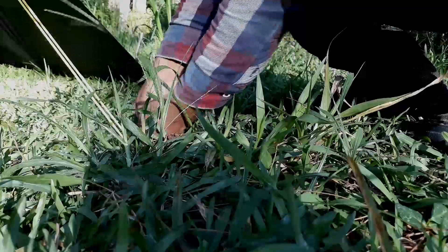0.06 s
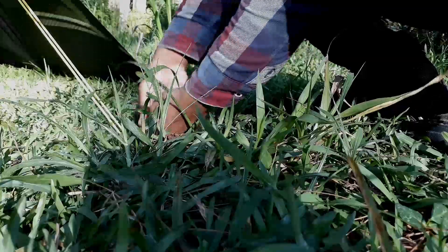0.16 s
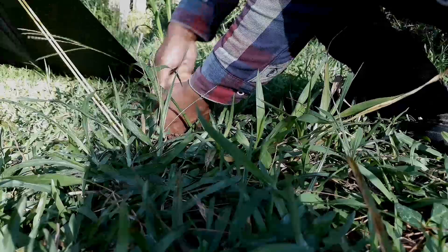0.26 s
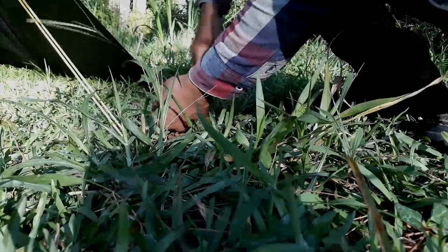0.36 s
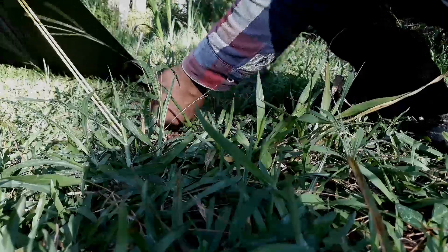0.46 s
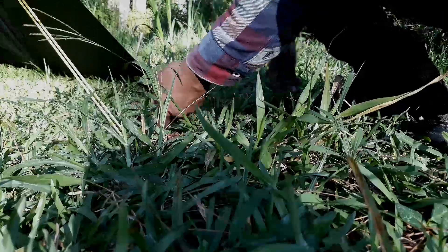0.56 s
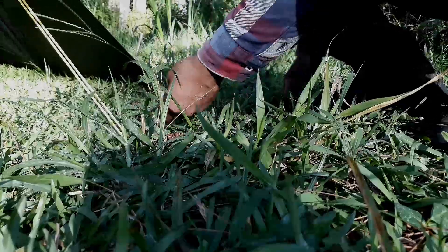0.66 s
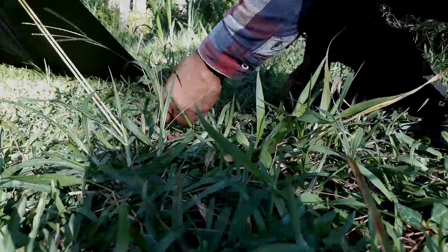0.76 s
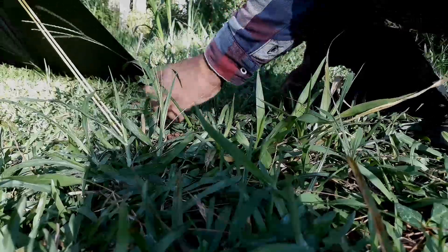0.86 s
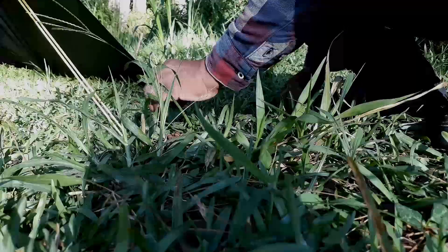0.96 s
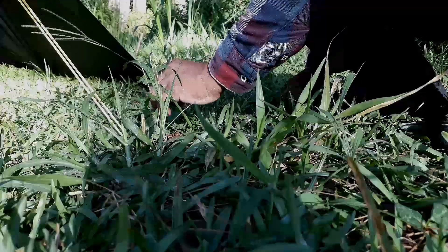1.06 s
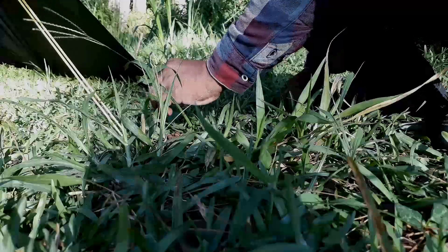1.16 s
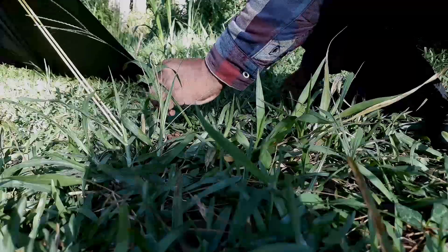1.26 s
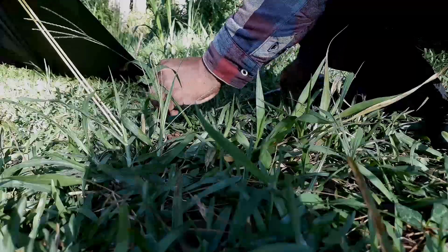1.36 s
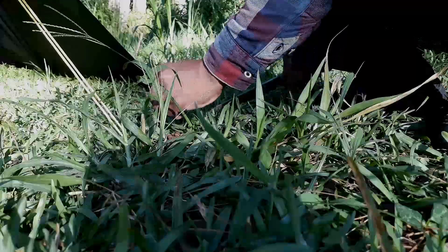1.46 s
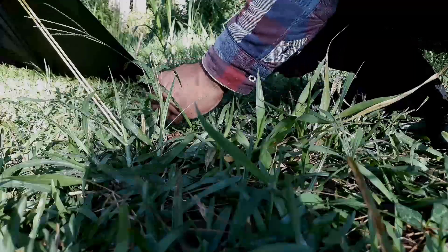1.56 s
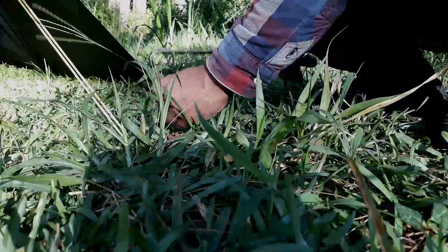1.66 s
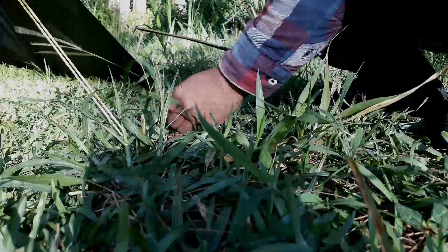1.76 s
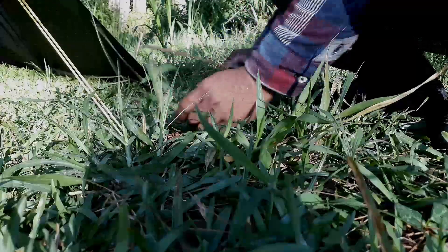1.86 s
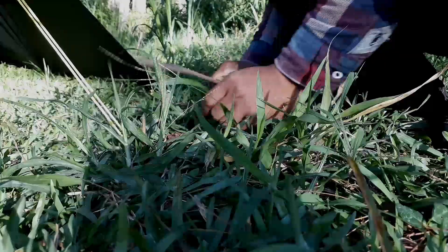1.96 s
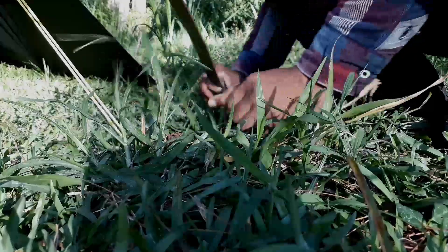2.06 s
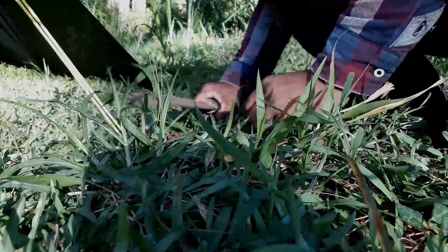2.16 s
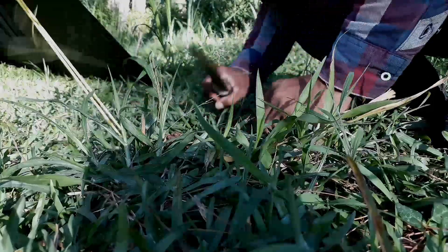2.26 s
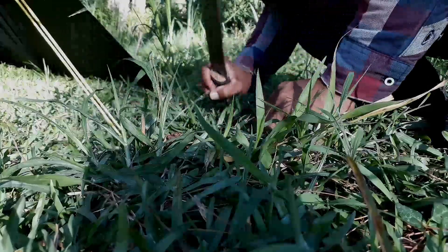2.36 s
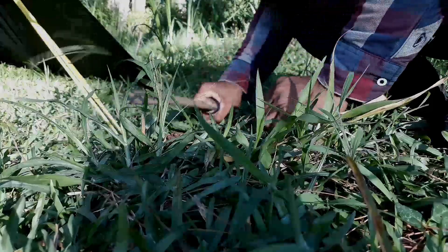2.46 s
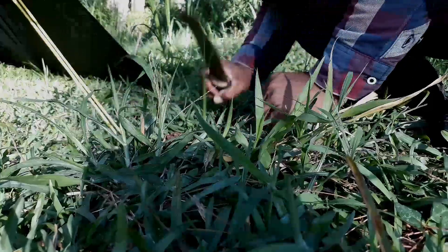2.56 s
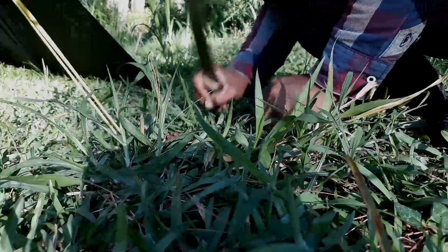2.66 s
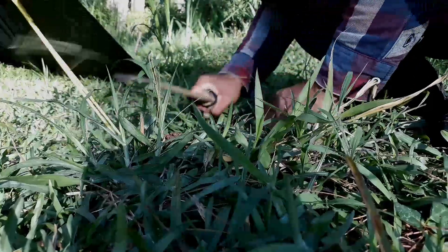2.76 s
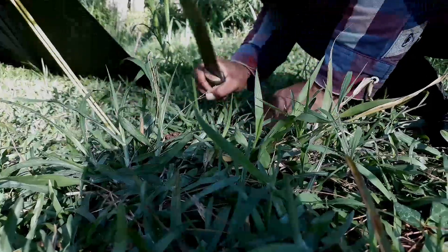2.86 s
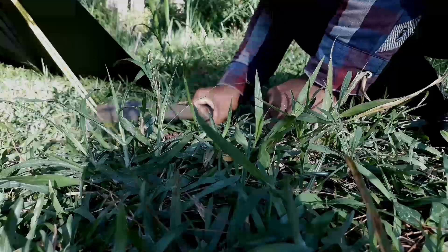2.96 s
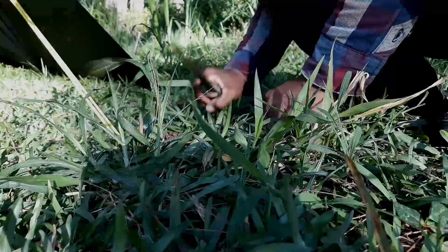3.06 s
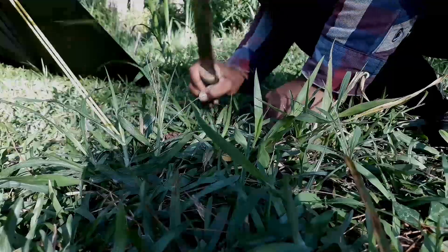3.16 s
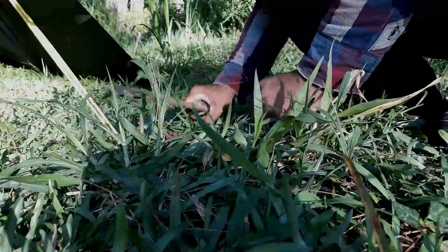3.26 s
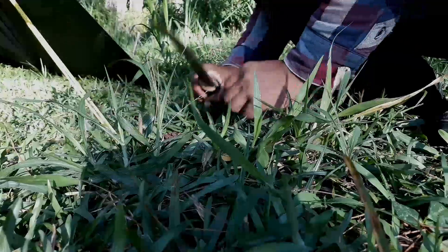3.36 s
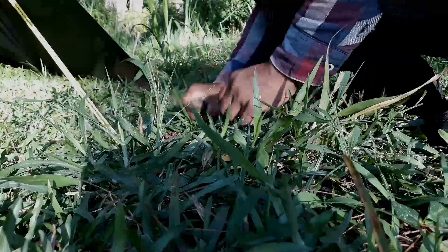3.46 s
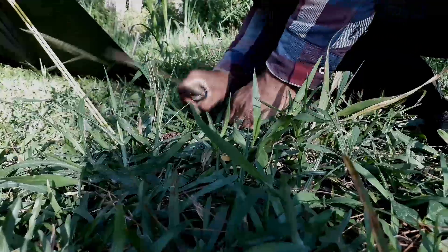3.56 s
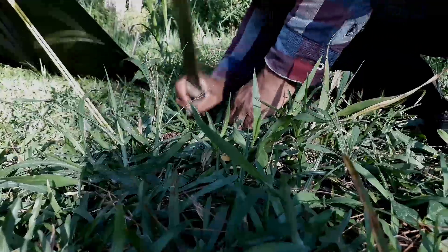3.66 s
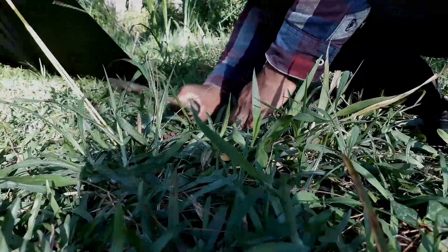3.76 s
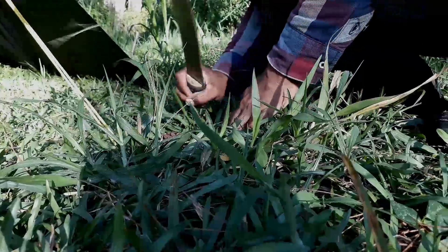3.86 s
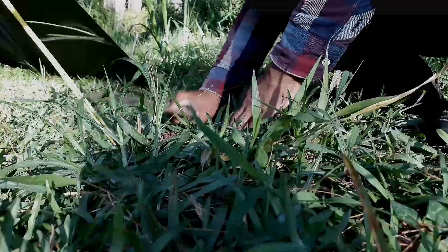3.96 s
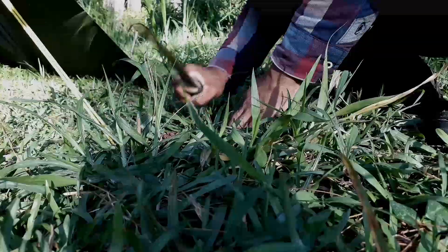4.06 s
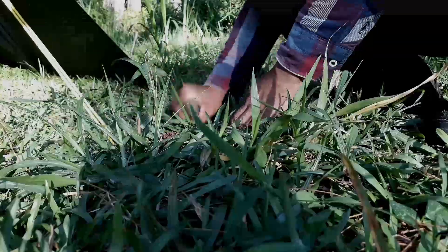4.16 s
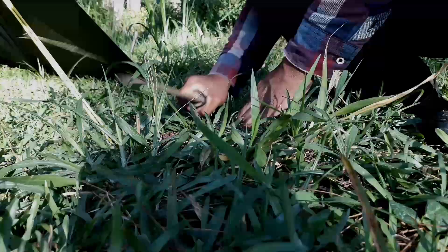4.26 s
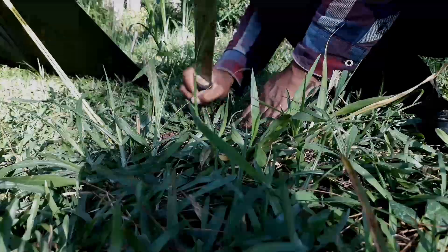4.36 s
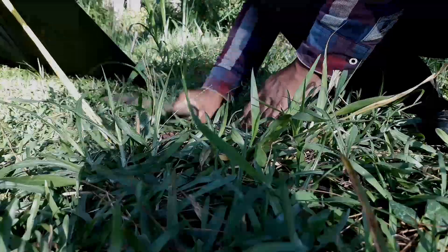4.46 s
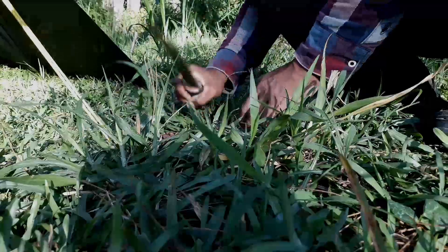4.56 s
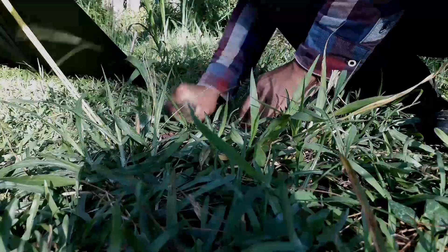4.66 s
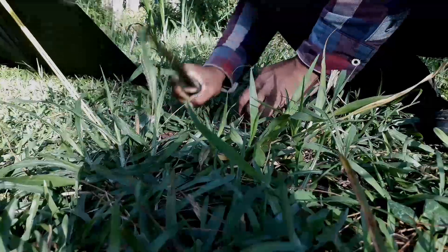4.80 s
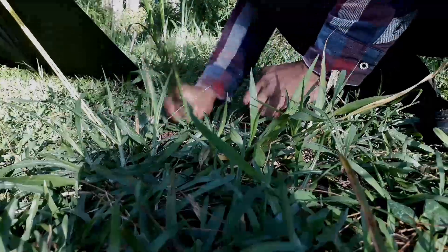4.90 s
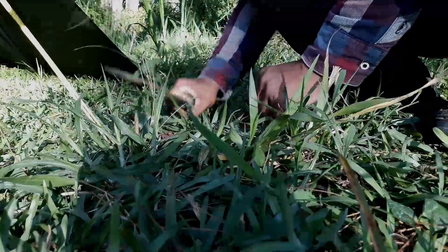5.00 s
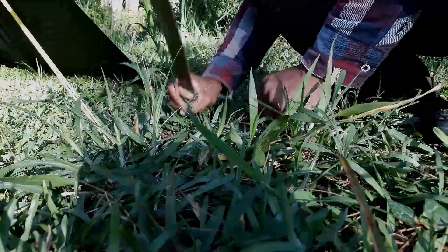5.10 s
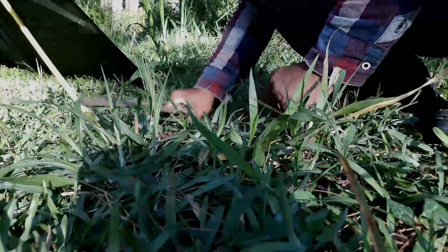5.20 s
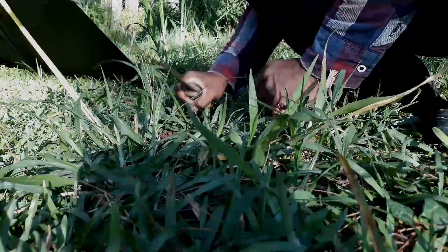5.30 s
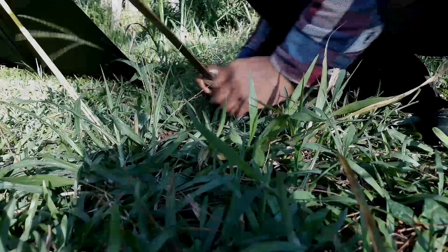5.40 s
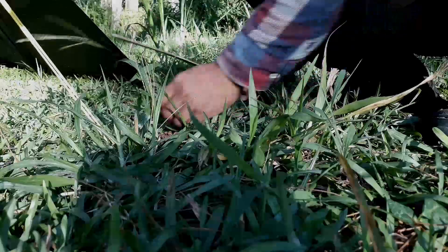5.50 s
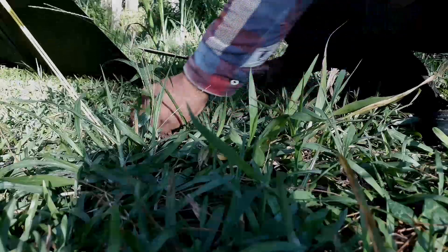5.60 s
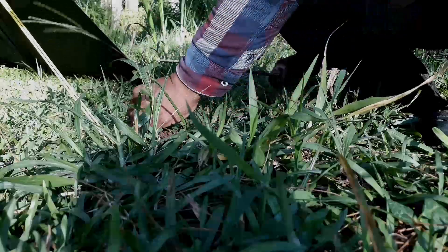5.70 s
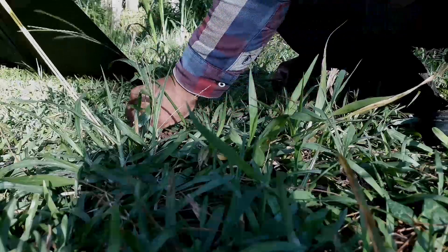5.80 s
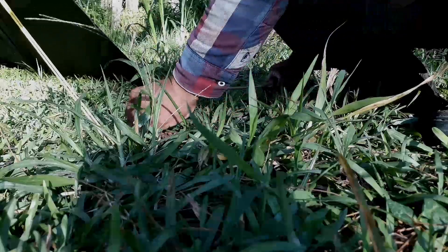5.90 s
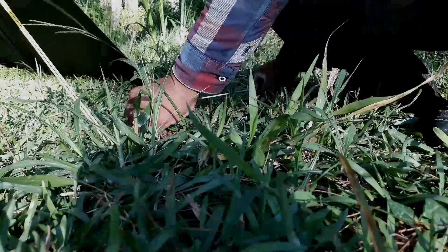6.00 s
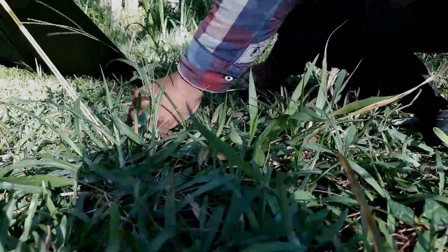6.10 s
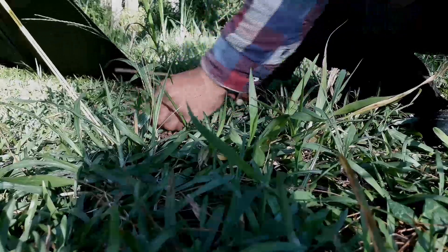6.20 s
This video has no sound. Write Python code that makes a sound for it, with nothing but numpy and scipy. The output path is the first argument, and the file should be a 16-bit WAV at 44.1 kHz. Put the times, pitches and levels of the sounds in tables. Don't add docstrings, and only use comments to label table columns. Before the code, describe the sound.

Outdoors, with the microphone at ground level near the action. From 0 to 2 s it is very quiet: light wind, a faint low-mid drone far away, and hands stirring dry grass. At about 0.33 s a cord slips with a thin rising squeak that sags; around 0.7 s a short crisp brush sweeps the tuft. At 2.2 s a steel tool starts striking a wooden stake, thirteen blows about a quarter second apart until 5.23 s. Each is a dry, very short woody crack with a small soft soil thump. The early hits carry sharp steel squeals and gritty scrapes, strongest near 2.5 and 3.05 s; hits from 4.3 s are louder and firmer, peaking near 4.5 s. Small stems snap and faint chirps slip between. After 5.3 s only sparse grass ticks, tiny squeaks and the fading drone remain, then a soft arching bird call at 6 s, faintly echoed.

```python
import sys
import numpy as np
from scipy import signal
from scipy.fft import rfft, irfft, next_fast_len
from scipy.io import wavfile
from scipy.ndimage import map_coordinates

SR = 44100
rng = np.random.default_rng(int(sys.argv[2]) if len(sys.argv) > 2 else 0)


def log_audio(samples):
    frames = np.atleast_2d(samples).T
    limited = np.clip(frames, -1, 1)
    pcm = np.round(limited * 32767).astype(np.int16)
    wavfile.write(sys.argv[1], SR, pcm)


def gain_from_db(level_db):
    decades = np.asarray(level_db, float) / 20
    return 10 ** decades


N = 275184


def unit(x):
    return x / np.sqrt(np.mean(x ** 2) + 1e-20)


def curve(rows):
    s, value = np.transpose(rows)
    return np.interp(np.arange(N) / SR, s, value)


def wobble(rate_hz):
    knots = rng.standard_normal(int(N * rate_hz / SR) + 4)
    return map_coordinates(knots, [np.arange(N) * rate_hz / SR])


def filtered(x, response):
    m = next_fast_len(x.shape[-1] + 8192)
    spectrum = rfft(x, m) * response(np.fft.rfftfreq(m, 1 / SR))
    return irfft(spectrum, m)[..., :x.shape[-1]]


def coloured(x, points):
    hz, db = np.transpose(points)
    return filtered(x, lambda f: gain_from_db(np.interp(np.log(f + 1), np.log(hz + 1), db, left=-120, right=-120)))


def noise(points, n=N):
    return unit(coloured(rng.standard_normal(n), points))


def add(track, s, sound):
    part = track[round(s * SR):][:len(sound)]
    part += sound[:len(part)]


# [t/s, level/dB]
FAR_DRONE = [
    (0.0, -50.5),
    (1.4, -53.5),
    (2.4, -50.5),
    (3.45, -48.5),
    (4.3, -53.5),
    (5.3, -55.5),
    (5.9, -60.5),
    (6.24, -59.5),
]
# [f/Hz, density/dB per Hz]
DRONE_SPECTRUM = [(210, -23), (350, -11), (590, -5), (793, 0.5), (1120, -12.5), (1910, -27.5), (3000, -41),
                  (6600, -110)]
# [f/Hz, density/dB per Hz]
RUMBLE_SPECTRUM = [(3, 9), (15, -2.5), (40, -12), (100, -16.5), (200, -18), (400, -23.5), (900, -34)]
# [f/Hz, density/dB per Hz]
HISS_SPECTRUM = [(1200, -5), (2200, -0.5), (6500, -10), (8000, -12), (9700, -16), (12500, -7), (16000, -12)]
# [f/Hz, density/dB per Hz]
SIDE_HISS_SPECTRUM = [(1200, -32), (2200, 5), (6000, -5), (7300, -14.5), (11400, -4.5), (16000, -5)]


def air():
    wind_db = -55
    swell = gain_from_db(curve(FAR_DRONE) + wobble(4.65))
    gust = gain_from_db(wind_db + 0.79 * wobble(3.24))
    mid = swell * noise(DRONE_SPECTRUM)
    mid += gain_from_db(7) * gust * noise(RUMBLE_SPECTRUM)
    mid += gain_from_db(-69.0) * noise(HISS_SPECTRUM)
    side = gain_from_db(3) * swell * noise(DRONE_SPECTRUM)
    side += gain_from_db(9.5) * gust * noise(RUMBLE_SPECTRUM)
    side += gain_from_db(-76.5) * noise(SIDE_HISS_SPECTRUM)
    return mid, side


# [t/s, level/dB]
RUSTLE_LEVEL = [
    (0.0, -64.5),
    (0.4, -68),
    (0.9, -67.5),
    (1.7, -72),
    (2.1, -64.5),
    (3.1, -72.5),
    (3.8, -69.5),
    (4.3, -72),
    (4.95, -66.5),
    (6.24, -75.5),
]
# [f/Hz, density/dB per Hz]
GRIT_SPECTRUM = [(1500, -22), (3500, -2.5), (6000, 2.5), (8000, -4.5), (9500, -13), (12500, -7),
                 (16000, -9.5)]
# [t/s, peak level/dB, ping f/Hz]
STEM_SNAPS = [(0.2055, -51, 6450), (0.9433, -42, 4750), (1.7429, -48, 5960), (1.936, -47, 6600),
              (2.0343, -46, 6260), (2.1497, -47, 3010), (2.589, -33.5, 6300), (2.8594, -50, 6000),
              (3.1203, -49, 6330), (3.4057, -47, 6000), (3.715, -51, 6300), (3.893, -48, 6150),
              (4.3562, -47, 6490), (4.388, -53, 6430), (4.6468, -48, 5700), (4.8319, -52, 7410),
              (4.8473, -41, 5550), (5.413, -46.5, 6270), (5.4635, -53.5, 6800), (5.704, -49.5, 4940)]
# [t/s,
# peak level/dB, body level/dB]
TOUCHES = [(.707, -52, 10.5), (0.7233, -42, 7), (.735, -48.5, 6), (0.745, -47, -2), (.759, -50, 0.5),
           (0.776, -49, 5), (.799, -61, -9), (0.809, -61, -7), (.951, -55, 1), (2.201, -40, 7),
           (2.2035, -45, 14), (2.4884, -56, 6), (4.0084, -55, -2), (4.2503, -53, -14), (4.7367, -56, 6.5),
           (5.2141, -58, 13), (5.244, -50, 8), (5.256, -57, 2)]


def grass():
    sweep_s, touch_s, hold_s = 0.733, 0.63, 0.049
    sweep_db, rise_db_per_s, fall_db_per_s = -49.5, 75, 500
    body = [(300, 5), (700, -1), (2200, -9), (3500, -24)]

    rub_db = curve(RUSTLE_LEVEL) + 1.3 * wobble(6)
    late_s = np.arange(N) / SR - sweep_s
    outside_s = np.maximum(late_s - hold_s, 0) + np.maximum(touch_s - sweep_s - late_s, 0)
    push_db = sweep_db + rise_db_per_s * np.minimum(late_s, 0) - fall_db_per_s * outside_s
    rub_clumps_db = 2 * wobble(40) + 3 * wobble(700)
    sweep_clumps_db = 1.2 * wobble(50) + 3 * wobble(1100)
    rub, sweep = rng.standard_normal((2, N)) * gain_from_db([rub_clumps_db, sweep_clumps_db])
    out = gain_from_db(rub_db) * unit(coloured(rub, GRIT_SPECTRUM))
    out += gain_from_db(push_db) * (unit(coloured(sweep, GRIT_SPECTRUM)) + unit(coloured(sweep, body)))

    t = np.arange(400) / SR
    for s, db, hz in STEM_SNAPS:
        ping = noise([(0.4 * hz, -20), (1.2 * hz, 0), (1.0 * hz, 0), (1.88 * hz, -20)], len(t))
        snap = ping + gain_from_db(-7) * noise(GRIT_SPECTRUM, len(t))
        add(out, s, gain_from_db(db - 2 - 60 * t / .009) * snap)
    for s, db, body_db in TOUCHES:
        brush = noise(GRIT_SPECTRUM, len(t)) + gain_from_db(body_db) * noise(body, len(t))
        add(out, s, gain_from_db(db + 3.5 - 60 * t / 0.0094) * brush)
    return out


def guy_line():
    start_s, rise_s, sag_s, fade_s = .325, .065, 0.049, .012
    low_hz, top_hz, sag_hz_per_s = 2200, 5450, 13000
    level_db, tight_db, tight_s = -61.5, 9, 0.0072

    t = np.arange(N) / SR - start_s - rise_s
    rise = np.clip(1 + t / rise_s, 0, 1) ** 1.6
    hz = low_hz + (top_hz - low_hz) * rise - sag_hz_per_s * np.clip(t, 0, sag_s)
    on = np.clip(np.minimum(t + rise_s, sag_s - t) / fade_s, 0, 1)
    db = level_db + tight_db * np.exp(-(t / tight_s) ** 2)
    phase = 2 * np.pi * np.cumsum(hz) / SR
    fuzz = (.55 + .85 * unit(wobble(600))) * np.sin(phase)
    fuzz += gain_from_db(-7) * (hz / 5300) ** 3 * unit(wobble(900)) * np.sin(1.26 * phase)
    fuzz += gain_from_db(-3 + level_db - db) * noise([(1500, -10), (2500, -2), (5000, -3), (7500, -11)])
    return on * gain_from_db(db + 1 + 2.5 * wobble(80)) * fuzz


def whistle(hz, db):
    waver_hz = 30
    t = np.arange(len(hz)) / SR
    edge = np.clip(np.minimum(t, t[-1] - t) / 0.0031, 0, 1)
    phase = 2 * np.pi * np.cumsum(hz + waver_hz * wobble(305)[:len(t)]) / SR
    return np.sqrt(2) * edge * gain_from_db(db + 2.5 * wobble(124)[:len(t)]) * np.sin(phase)


# [t/s, length/s, first f/Hz, last f/Hz, peak level/dB]
BIRD_NOTES = [
    (1.76, .06, 10550, 10400, -79),
    (2.554, 0.04, 5100, 4480, -62),
    (2.86, 0.037, 4660, 4300, -62),
    (5.411, 0.01, 2830, 2450, -59),
    (5.421, .02, 2580, 2000, -64),
    (5.819, 0.014, 2700, 2400, -64),
]
# [delay t/s, level/dB]
TRUNK_ECHOES = [
    (.058, -14),
    (.128, -21),
    (.17, -20),
]


def birds():
    edge_db = 9
    call_s, call_length_s, top_s, loud_s = 5.996, .074, .05, 0.046
    top_hz, bend_hz_per_s2, call_db, bend_db_per_s2 = 2610, 340000, -55, 9000

    out = np.zeros(N)
    for s, length_s, first_hz, last_hz, db in BIRD_NOTES:
        u = np.arange(0, length_s, 1 / SR) / length_s
        add(out, s, whistle(first_hz + (last_hz - first_hz) * u, db - edge_db * (2 * u - 1) ** 2))
    t = np.arange(0, call_length_s, 1 / SR)
    hz = top_hz - bend_hz_per_s2 * (t - top_s) ** 2
    db = call_db - bend_db_per_s2 * (t - loud_s) ** 2
    for delay_s, echo_db in [(0, 0)] + TRUNK_ECHOES:
        add(out, call_s + delay_s, whistle(hz, db + echo_db))
    return out


# [peak t/s, squeal level/dB, squeal f/Hz, lead t/ms, grit level/dB]
STEEL_SKIDS = [(2.2054, -27.5, 5440, 1.9, -24), (2.5151, -19.5, 6330, 3.55, -26),
               (2.7941, -30, 7540, 5.2, -38.5), (3.0459, -20, 6330, 2.7, -29), (3.3111, -37, 5900, .9, -25),
               (3.5645, -44, 6400, 3.9, -37.5), (3.7947, -46, 6270, 5.9, -35.5),
               (4.0296, -37.5, 6500, 2.2, -38.5), (4.2679, -37.5, 6360, 1.3, -55),
               (4.5238, -34, 5860, 2.9, -51), (4.7674, -39, 6800, 1.8, -43), (5.0040, -57, 5140, 0.98, -35),
               (5.2327, -39, 6600, 1.1, -46)]
# [f/Hz, t60/s]
BLADE_MODES = [
    (12210, .05),
    (13150, .05),
]
# [f/Hz, density/dB per Hz]
SPARK_SPECTRUM = [(1500, -14), (3500, -0.5), (6500, 5.5), (8500, -11.5), (11000, -1), (14500, 2.5),
                  (16500, -20)]


def skids():
    swish_ms, settle_ms = 10.7, 23.2
    stem_body = [(800, -11), (1500, -3), (3000, -6), (4500, -30)]

    out = np.zeros((2, N))
    t = np.arange(SR // 5) / SR - .06
    n = len(t)
    for (s, squeal_db, hz, lead_ms, grit_db), (*_, spread, shake_db) in zip(STEEL_SKIDS, STAKE_BLOWS):
        start_s, lead_s = s + t[0], lead_ms / 1000
        stroke = np.where(t < 0, gain_from_db(9 * t / lead_s) * (t > -lead_s), np.exp(-np.abs(t) / 0.0016))
        width_hz = np.interp(squeal_db, [-30, -18], [2200, 700])

        def resonance(f):
            return (1j * f * width_hz / (hz * hz - f * f + 1j * f * width_hz)) ** 2

        ring = np.zeros(n)
        for (mode_hz, t60), mode_db in zip(BLADE_MODES, (0, -6)):
            ring += gain_from_db(mode_db - 60 * t / t60) * np.sin(2 * np.pi * mode_hz * t) * (t > 0)
        add(out[0], start_s, gain_from_db(.7 * (squeal_db + grit_db)) * ring)

        for track, share, bright_db in zip(out, (np.cos(spread), np.sin(spread)), (0, 4)):
            squeal = gain_from_db(squeal_db) * unit(filtered(rng.standard_normal(n), resonance))
            grit = gain_from_db(grit_db + bright_db) * noise(SPARK_SPECTRUM, n)
            add(track, start_s, share * stroke * (squeal + grit))

        halo = gain_from_db(shake_db) * np.exp(-np.abs(t) * 1000 / np.where(t < 0, swish_ms, settle_ms))
        stems = noise(GRIT_SPECTRUM, n) + gain_from_db(-3) * noise(stem_body, n)
        add(out[0], start_s, halo * stems)
    return out


# [deepest push t/s, level/dB, hard ring level/dB, noise angle from mid to side/rad, tuft shake level/dB]
STAKE_BLOWS = [(2.2077, -19, -28, 0.12, -52), (2.5155, -13, -10, 0.25, -52),
               (2.7949, -15.5, -21.5, 0.33, -53), (3.0468, -13, -25, 0.02, -49.5),
               (3.3128, -12, -31, 0.02, -52), (3.5642, -11.5, -24, 0.03, -53.5),
               (3.7950, -11.5, -34, 0.24, -52.5), (4.0295, -10, -17, 0.04, -54.5),
               (4.2684, -7.5, -12.5, 0.5, -50), (4.5248, -4.5, -6.5, 0.9, -50),
               (4.7686, -6.5, -13, 0.11, -47), (5.0057, -6, -12, 0, -47), (5.2332, -8.5, -18, .02, -48)]
# [f/Hz, level/dB, t60/s, side of the node/sign]
WOOD_MODES = [(156, -20, .027, 1), (264, -19, .035, 1), (795, -14.7, .029, -1), (935, -11, .019, -1),
              (1426, 1.7, .0085, -1), (1901, 10.8, .0075, -1), (2421, 12.4, .004, -1),
              (3910, 24.2, .003, 1)]
# [f/Hz, level/dB, t60/s]
HARD_MODES = [(2230, -4, .008), (2700, -10, .008), (3400, 0, .008), (3950, -5, .007), (4950, -11, .008),
              (5650, -12, .008), (6900, -17, .006)]
# [delay t/s, f/Hz, level/dB, half length/s]
SOIL_WAVES = [
    (.0085, 200, -37.5, 0.0062),
    (.0255, 163, -46.5, 0.0066),
    (0.0417, 75, -40, .008),
    (.0605, 55, -44, .011),
]
# [f/Hz, density/dB per Hz]
CLOD_SPECTRUM = [(45, 3), (100, 0), (200, 6.5), (350, -9), (500, -6)]


def blows():
    contact_ms, soft_contact_ms = 0.087, 0.097
    firms, softens = 0.12, 3.1
    grain_scatter = .03
    soil_db = 0.2

    out = np.zeros(N)
    t = np.arange(SR // 10) / SR
    for s, db, hard_db, *_ in STAKE_BLOWS:
        dwell_ms = contact_ms * gain_from_db(-firms * (db + 9.5)) + soft_contact_ms * gain_from_db(-softens * (db + 19.5))
        u = t[:200] * 1000 / dwell_ms
        force = u ** 5 * np.exp(-u)
        wavelet = np.gradient(np.gradient(force))

        loose_db = -7 * np.clip((4.3 - s) / 0.57, 0, 1)
        ring = np.zeros(len(t))
        for hz, level_db, t60, side in WOOD_MODES:
            mode_db = level_db + loose_db * (hz < 300)
            ring += side * gain_from_db(mode_db - 60 * t / t60) * np.sin(2 * np.pi * hz * t)
        knock = np.convolve(force / force.sum(), ring)[:len(t)]
        knock[:200] += gain_from_db(-5.9) * wavelet / -wavelet.min()
        knock /= -knock.min()
        start_s = s - np.argmin(knock) / SR
        add(out, start_s, gain_from_db(db) * knock)
        add(out, start_s + .00237, -gain_from_db(db - 13.2) * knock)

        hard = np.zeros(len(t))
        for hz, level_db, t60 in HARD_MODES:
            mode_db = level_db + rng.normal(0, 2.5)
            mode_hz = hz * rng.normal(1, grain_scatter)
            hard += gain_from_db(mode_db - 60 * t / t60) * np.sin(2 * np.pi * mode_hz * t)
        add(out, s - .0004, gain_from_db(db + hard_db) * hard * (1 - np.exp(-t / .00012)))

        shake = gain_from_db(-37.5 - 60 * t / 0.14) * noise(CLOD_SPECTRUM, len(t))
        for delay_s, hz, level_db, half_s in SOIL_WAVES:
            late = t - delay_s
            packet = np.cos(2 * np.pi * hz * late) * np.exp(-(late / half_s) ** 2)
            shake += gain_from_db(level_db + rng.normal(0, 2.1)) * packet
        add(out, s, gain_from_db(soil_db) * shake * (1 - np.exp(-t / 0.00022)))
    return out


def scene():
    mid, side = air()
    skid, skid_side = skids()
    near = grass() + guy_line() + birds() + skid + blows()
    side = side + skid_side + gain_from_db(-45) * np.roll(near, 20)
    return np.array([mid + near + side, mid + near - side])


def low_pass(x):
    return signal.sosfilt(signal.butter(12, 17000, fs=SR, output="sos"), x)


def record(dry):
    top_hz, offset = 16700, -.0005
    mix = filtered(dry, lambda hz: hz < top_hz) + offset
    return low_pass(mix)


dry = scene()
out = record(dry)
log_audio(out)
```